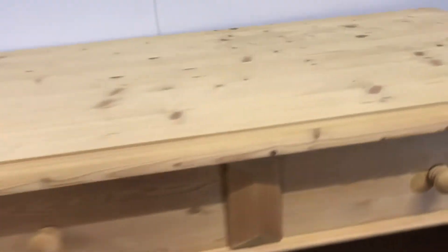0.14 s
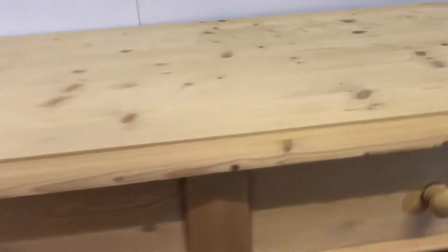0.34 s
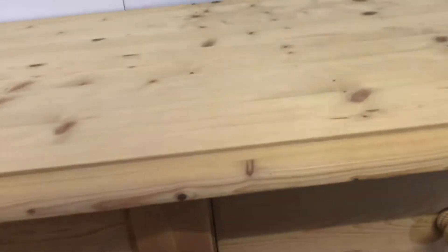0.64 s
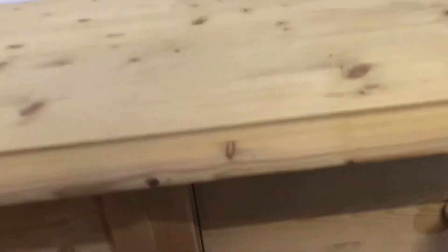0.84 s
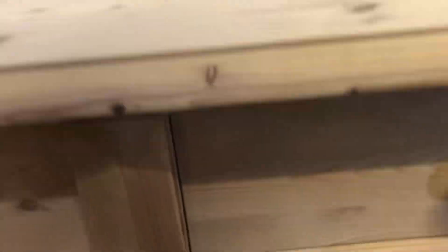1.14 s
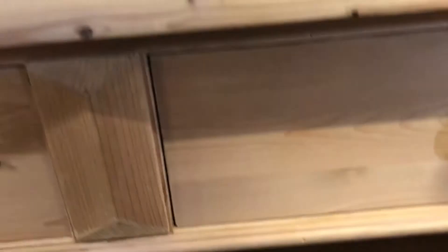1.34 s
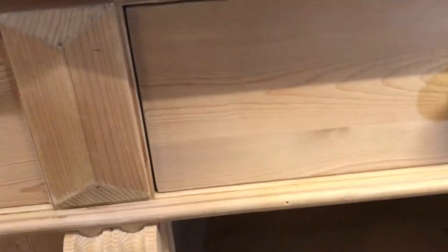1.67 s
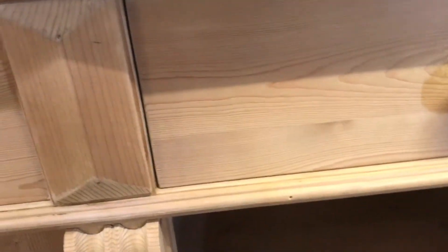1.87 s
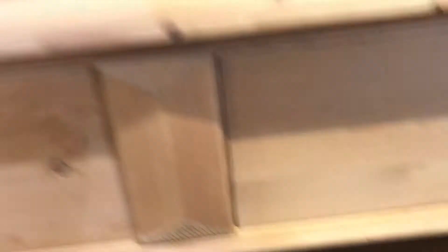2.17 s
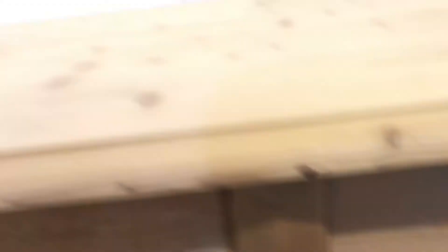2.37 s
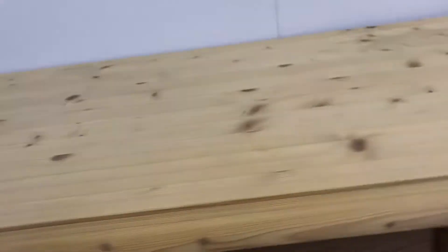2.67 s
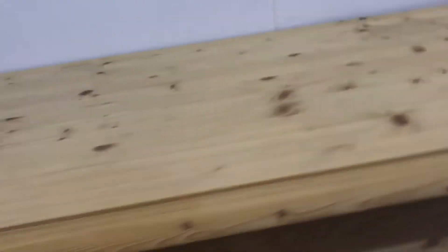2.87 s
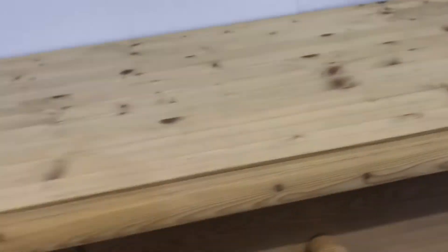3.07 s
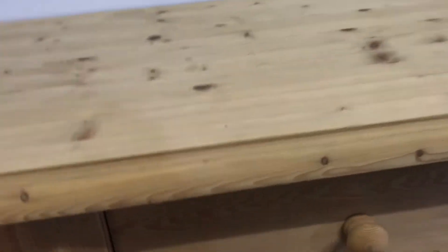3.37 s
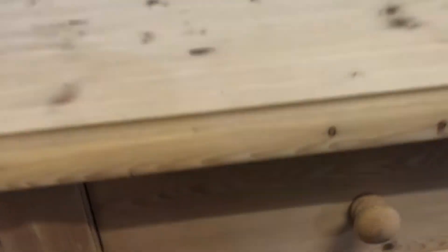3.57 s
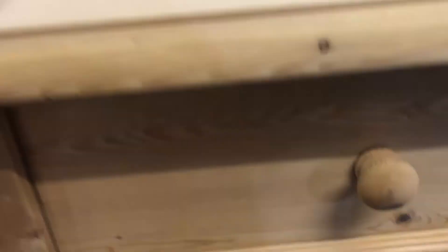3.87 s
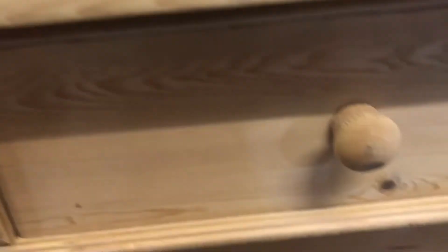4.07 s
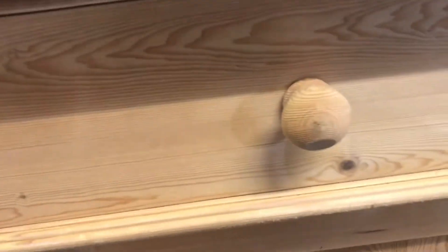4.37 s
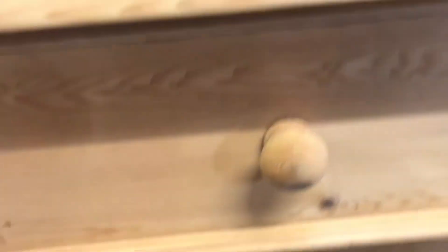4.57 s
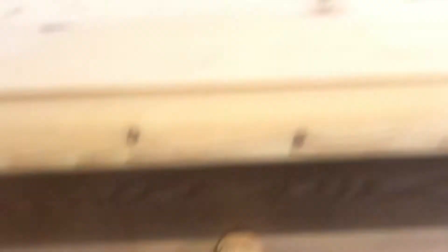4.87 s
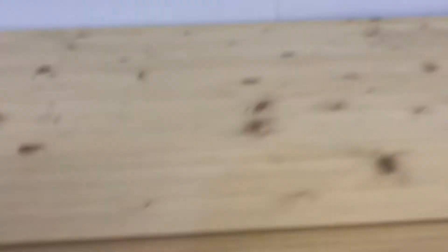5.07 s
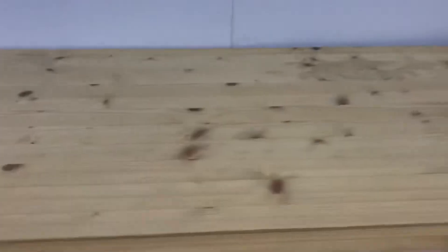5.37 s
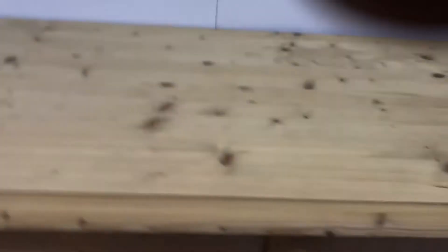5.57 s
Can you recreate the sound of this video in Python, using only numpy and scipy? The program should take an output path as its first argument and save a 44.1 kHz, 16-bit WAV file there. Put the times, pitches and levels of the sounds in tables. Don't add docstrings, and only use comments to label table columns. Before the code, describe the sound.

A quiet, spacious indoor hall with low hush, thin hiss and a very faint machine whine during the first second or so. Two tiny handling ticks come near 0.4 and 0.55 s. At 0.72 s a wooden cupboard door bangs shut, hollow and close, bouncing and striking again at 0.83 s. A second door thuds at 1.46 s with clattering rebounds until 1.6 s; a softer blow at 1.82 s comes with a scrape and short hinge squeaks. From 2 to 3.8 s there is only faint shuffling, cloth rubbing, soft bumps and ticks around 2.95 s. At 3.89 s a drawer jerks with a double knock, clacks at 4.05 s, and slams hard at 4.19 s. Another push brings a deep bump and piercing runner squeal at 4.43 s, then a catch clack at 4.51 s. Soft dragging follows, with clicks at 5.34 and 5.57 s and a bright sleeve swish around 5.5 s.

```python
import sys
import numpy as np
from scipy import signal
from scipy.fft import rfft, irfft, next_fast_len
from scipy.io import wavfile
from scipy.ndimage import uniform_filter1d

SR = 44100
rng = np.random.default_rng(int(sys.argv[2]) if len(sys.argv) > 2 else 0)


def voltage_ratio(level):
    return 10 ** (np.asarray(level, float) / 20)


def generate_wav(signal):
    frames = np.transpose(np.atleast_2d(signal))
    scaled = np.clip(frames, -1, 1) * 32767
    pcm = np.round(scaled).astype(np.int16)
    wavfile.write(sys.argv[1], SR, pcm)


N = 251896


def evened(x):
    return x / np.sqrt(np.mean(x ** 2) + 1e-20)


def read(points, hz):
    f, value = np.transpose(points)
    return np.interp(np.log(hz + 1), np.log(f + 1), value)


def add(mix, s, sound):
    part = mix[round(s * SR):][:len(sound)]
    part += sound[:len(part)]


def coloured(x, points):
    size = next_fast_len(len(x))
    gain = voltage_ratio(read(points, np.fft.rfftfreq(size, 1 / SR)))
    return evened(irfft(rfft(x, size) * gain, size)[:len(x)])


def band(x, lo_hz, hi_hz):
    return signal.sosfilt(signal.butter(3, [lo_hz, hi_hz], "bandpass", fs=SR, output="sos"), x)


def resonate(x, hz, width):
    r = np.exp(-np.pi * width / SR)
    return 2 * signal.lfilter([1 - r], [1, -r * np.exp(2j * np.pi * hz / SR)], x).real


def resonate_twice(x, hz, width):
    return resonate(resonate(x, hz, width), hz, width)


def gritty(spread_db, grain):
    lumps = evened(uniform_filter1d(rng.standard_normal(N), round(grain * SR)))
    return rng.standard_normal(N) * voltage_ratio(spread_db * lumps)


def swells(table):
    t = np.arange(0, N + 32, 32) / SR
    gain = np.zeros(len(t))
    for s, rise, *hold, fall, db in table:
        before = np.maximum(s - t, 0) / rise
        after = np.maximum(t - s - sum(hold), 0) / fall
        gain += voltage_ratio(db - 20 * (before + after))
    return np.interp(np.arange(N) / SR, t, gain)


def squeals(table, spread, shape=()):
    out, t = np.zeros(N), np.arange(SR // 3) / SR
    for row in table:
        s, hz, db, rise, t60 = (*row, *shape)
        whistle = evened(resonate_twice(rng.standard_normal(len(t)), hz, spread * hz))
        decay = voltage_ratio(db - 60 * np.maximum(t - rise, 0) / t60)
        add(out, s, decay * np.minimum(t / rise, 1) ** 2 * whistle)
    return out


def swings(table):
    out, t = np.zeros(N), np.arange(SR) / SR
    for s, hz, db, rise, t60 in table:
        swell = voltage_ratio(db - 60 * np.maximum(t - rise, 0) / t60) * np.minimum(t / rise, 1)
        add(out, s, -swell * np.sin(2 * np.pi * hz * t))
    return out


# start in Hz, drift in Hz per s, level in dB.
WHINE = [(1400, 0, -83), (1690, 0, -83), (2880, -40, -83), (3840, -40, -84), (4800, -40, -85),
         (5750, -60, -88), (6200, -300, -81)]
# time in seconds, gain in dB.
WHINE_FADE = [(0, 0.5), (.7, 5.5), (1.25, 2), (1.45, -24), (5.71, -13)]
# frequency in Hz, density in dB per Hz.
HUSH = [(12, -9.5), (20, 9), (44, -9.5), (123, -14), (156, -19), (300, -23), (534, -23), (3500, -33.5),
        (4550, -65), (7700, -120)]
# frequency in Hz, density in dB per Hz.
HISS = [(2060, -40), (3500, -10), (3870, 0), (4210, -5), (11300, -2), (16000, -6)]


def air():
    t = np.arange(N) / SR
    waver = resonate(rng.standard_normal((len(WHINE), N)), 0, 8)
    whine = np.zeros(N)
    for (hz, drift, db), w in zip(WHINE, waver):
        whine += voltage_ratio(db + 2.2 * evened(w)) * np.sin(2 * np.pi * (hz + drift * t / 2) * t)
    hush = voltage_ratio(-61) * coloured(rng.standard_normal(N), HUSH)
    hiss = voltage_ratio(-72) * coloured(rng.standard_normal(N), HISS)
    return hush + hiss + whine * voltage_ratio(np.interp(t, *np.transpose(WHINE_FADE)))


# start in seconds, level in dB.
PALMS = [(.01, -66.5), (.55, -61), (1.38, -71.5), (2.64, -69), (2.85, -67), (3.02, -65), (5.122, -58.5),
         (5.35, -59), (5.555, -60)]


def palms():
    rise_s, fall_s = 0.062, 0.12
    return swells([(s, rise_s, fall_s, db) for s, db in PALMS])


# start, rise, hold if any and fall in seconds, level in dB.
SLEEVES = [(.16, .4, 0.22, -76), (.46, .5, 0.14, 0.13, -73.5), (1.35, 1, 0.019, .03, -71),
           (2.332, 0.13, 0.14, -62), (2.744, 0.39, .12, -75), (2.982, 0.078, .04, -55),
           (3.03, .05, 0.091, .3, -66.5), (4.95, 0.52, 0.12, 2, -67), (5.6, .4, .11, .1, -60.5)]
# frequency in Hz, density in dB per Hz.
RUSTLE = [(1500, -30), (2500, 0), (6000, -1), (9000, -3), (12000, -4), (14000, -8), (16000, -14)]


def sleeves():
    return swells(SLEEVES) * coloured(gritty(0.91, 0.0032), RUSTLE)


# start, rise, hold if any and fall in seconds, level in dB.
SOLES = [(.2, 2.5, 0.31, 0.39, -66.5), (1.12, 0.059, 0.0092, 0.61, -66), (2.08, .03, 0.009, 0.11, -67),
         (2.332, 0.14, .01, 0.13, -59.5), (2.98, 0.42, .15, .3, -61), (3.265, .06, .07, -61),
         (3.488, .2, .01, 0.083, -65), (4.66, 0.033, 0.0083, 0.13, -60), (5.06, 0.35, 0.035, 0.49, -62),
         (5.6, 0.76, 0.058, 0.38, -62.5)]
# frequency in Hz, density in dB per Hz.
SHUFFLE = [(100, -15), (200, -2.5), (500, 3), (1200, -2.5), (2300, -5), (3500, -11), (5000, -19),
           (8000, -60)]


def soles():
    shuffle = coloured(gritty(2.24, .008), SHUFFLE)
    rumble_points = [(15, -30), (30, 8), (55, -4.0), (100, -5.5), (160, -2), (300, -28)]
    rumble = coloured(rng.standard_normal(N), rumble_points)
    drag = swells(SOLES)
    return drag * shuffle + (voltage_ratio(-11.5) * drag + palms()) * rumble


# start, rise, hold if any and fall in seconds, level in dB.
DRAGS = [(.534, .35, .12, -66.5), (2.314, 0.18, 0.081, -68), (2.614, 0.083, 0.11, -69.5),
         (2.93, 0.14, .3, .12, -60), (3.472, .09, 0.071, -65.5), (4.7, 0.027, 0.37, -65.5),
         (5.15, 0.18, 0.4, -62.5), (5.7, 0.25, .1, -62)]
# frequency in Hz, width in Hz, level in dB.
BOARD = [(783, 92, 1.5), (939, 96, 3), (1066, 90, 2), (1400, 110, -8.5)]
# frequency in Hz, width in Hz, level in dB.
BOX = [(240, 58, -0.2), (321, 53, 2), (402, 47, -3)]


def drags():
    rub = gritty(1.9, 0.008)
    board = evened(sum(voltage_ratio(db) * resonate_twice(rub, hz, w) for hz, w, db in BOARD))
    box = evened(sum(voltage_ratio(db) * resonate_twice(rub, hz, w) for hz, w, db in BOX))
    hand = swells(DRAGS)
    return hand * board + (voltage_ratio(-11.5) * hand + palms()) * box


# start in seconds, peak in dB, ring in Hz.
TICKS = [(0.4219, -29.5, 2350), (0.546, -26.5, 4200), (1.0675, -40, 4020), (2.174, -40, 2160),
         (2.9159, -28, 4500), (2.952, -27, 5030), (2.981, -27.5, 6800), (2.985, -29, 6960),
         (2.9967, -28.5, 6900), (3.6915, -37, 2200), (5.3403, -21, 11040), (5.3473, -27, 4300),
         (5.5745, -20, 4270)]


def ticks():
    out, t = np.zeros(N), np.arange(1500) / SR
    grip_s = 5
    for s, peak_db, hz in TICKS:
        click = band(rng.standard_normal(len(t)), 0.7 * hz, min(2.4 * hz, 15000))
        snap = voltage_ratio(-60 * t / 0.0058) * (0.99 * np.sin(2 * np.pi * hz * t) + click)
        thud = -np.sin(2 * np.pi * 190 * t) * voltage_ratio(-60 * t / 0.0088)
        add(out, s, voltage_ratio(peak_db - 10.5) * snap + voltage_ratio(2 * peak_db + 12.5) * thud * (s > grip_s))
    return out


# start in seconds, pitch in Hz, level in dB,
# rise and t60 in seconds.
BUMPS = [(0.541, 70, -55, 0.011, 0.081), (0.693, 170, -43, 0.004, 0.07), (1.422, 119, -50, 0.011, 0.18),
         (1.42, 262, -64, 0.013, 0.099), (2.818, 92.4, -49, 0.073, 0.26), (3.02, 44.5, -41.5, 0.021, 0.24),
         (3.44, 87, -47.5, 0.031, 0.09), (3.447, 400, -57.5, 0.031, 0.27), (4.438, 65.8, -26, 0.004, 0.2),
         (3.06, 70, -52, .02, .2), (3.14, 45, -52, .02, .2), (3.31, 45, -52, .02, .15),
         (3.52, 48, -54, .02, .4), (3.44, 180, -60, .03, .2), (2.83, 190, -60, .02, .2),
         (5.1, 207.5, -51, 0.024, 0.054), (5.102, 52.7, -43, 0.021, 0.078), (3.888, 549, -28.5, 0.03, .4),
         (4.5, 78, -41, .025, .3), (5.21, 55, -52, .03, .2)]


def bumps():
    return swings(BUMPS)


# frequency in Hz, density in dB per Hz.
CRACK = [(1500, -52), (2600, 4), (3400, 3), (4600, 8), (6000, 2), (8500, -2.5), (11500, -3), (13000, -5),
         (16000, -13)]


def blows(table, modes, rise, hard_db, damping=1):
    out, t = np.zeros(N), np.arange(SR // 2) / SR
    build_s = .0022
    usual_chatter_s, crack_db_per_halving = 0.049, 6.5
    for s, blow_db, boom_db, knock_db, t60 in table:
        t60 = max(t60, .01)
        crack_db = blow_db + hard_db + crack_db_per_halving * np.log2(usual_chatter_s / t60)
        fall = voltage_ratio(-60 * t / t60) * np.minimum(t / (rise + build_s), 1)
        lumps = evened(uniform_filter1d(rng.standard_normal(len(t)), 60))
        chatter = fall * rng.standard_normal(len(t)) * voltage_ratio(2.35 * lumps)
        chatter += 1.05 * np.exp(-((t - rise) / (0.14 * rise)) ** 2)
        push = band(np.sin(np.pi * np.clip((t - .002) / 0.0074, 0, 1)), 40.4, 360)
        drives = [push, band(chatter, 150, 800), band(chatter, 600, 1.06 * modes[-1][0])]
        parts = np.array([0 * t, .022 * drives[1], .015 * drives[2]])
        spots = rng.standard_normal((len(modes), 2))
        for (hz, db, ring), (spot, shift) in zip(modes, spots):
            group = (hz > 160) + (hz > 700)
            mode = resonate(drives[group], hz * (1 + .008 * shift), 2.2 * damping / ring)
            parts[group] += voltage_ratio(db + 1.5 * spot) * ring * mode
        parts /= abs(parts).max(axis=1, keepdims=True)
        crack = coloured(rng.standard_normal(len(t)), CRACK) * fall
        add(out, s, voltage_ratio([boom_db, blow_db - 2, knock_db - 0.6]) @ parts + voltage_ratio(crack_db + 5.3) * crack)
    return out


# start in seconds, blow, boom and knock in dB, chatter t60 in seconds.
DOOR_BLOWS = [
    (0.721, -15, -16, -18.5, 0.074),
    (0.832, -17, -23, -23.5, 0.15),
    (1.463, -18.5, -16.5, -24, 0.11),
    (1.822, -22, -23, -38, 0.061),
]
# start in seconds, blow, boom and knock in dB, chatter t60 in seconds.
DOOR_REBOUNDS = [(0.736, -14, -38, -21.5, 0.036), (0.751, -17.5, -29, -42, 0.034),
                 (0.845, -24, -25, -49, 0.1), (0.903, -36, -43, -45, 0.082), (1.477, -17, -50, -31, 0.013),
                 (1.491, -23.5, -43, -48, 0.057), (1.546, -20.5, -36, -32.5, 0.16),
                 (1.564, -19.5, -35, -41, 0.13), (1.609, -26.5, -28, -37, 0.054),
                 (1.69, -47, -48, -48, 0.042), (1.837, -27, -36, -31.5, 0.11), (1.87, -37, -50, -56, 0.036),
                 (1.898, -46, -40, -49, 0.042), (1.943, -45, -60, -52, 0.061)]
# frequency in Hz, level in dB, t60 in seconds.
DOOR = [(54, -21, 0.71), (79.5, -22, 0.07), (110, 6, 0.13), (127.2, 0.5, 0.18), (168, -13.5, 0.4),
        (230.3, -5, 0.097), (275, 0.5, 0.09), (295, -25, 0.035), (403, -5.5, 0.15), (431.6, 4.5, 0.1),
        (466, -10, 0.14), (552, 1, 0.1), (535, -15, 0.11), (795, 0.5, 0.055), (915, 0, 0.037),
        (1064, 9, .04), (1206, 4, 0.031), (1270, 1, .05), (1464, 8, 0.037), (1630, -21, 0.056),
        (1810, -19, .04), (2232, -6, 0.05), (2490, -8, 0.07)]


def doors():
    hits = blows(DOOR_BLOWS, DOOR, 0.001557, hard_db=-25, damping=1.24)
    return hits + blows(DOOR_REBOUNDS, DOOR, 0.00493, hard_db=-28.5, damping=1.86)


# frequency in Hz, t60 in seconds.
HALL = [(40, 0.73), (120, 0.75), (300, 0.55), (1000, 0.52), (2000, 0.4), (4000, 0.45), (8000, 0.4),
        (16000, 0.11)]
# frequency in Hz, level in dB.
HALL_BASS = [(45, -5), (75, -6), (130, -6), (200, -1), (500, -1), (1200, 0), (2200, -1.5), (3500, 1.5)]


def hall(x):
    hz, t, z = signal.stft(rng.standard_normal(SR), SR, nperseg=512)
    decay = voltage_ratio(read(HALL_BASS, hz)[:, None] - 60 * t / read(HALL, hz)[:, None])
    tail = signal.istft(z * decay, SR, nperseg=512)[1]
    tail = tail * np.minimum(np.arange(len(tail)) / (0.0034 * SR), 1)
    return signal.fftconvolve(x, tail / np.linalg.norm(tail))[:N]


# start in seconds, pitch in Hz, level in dB, rise and t60 in seconds.
KNOCKS = [(.724, 1080, -30, .005, .07), (.745, 2520, -46, .006, .08), (.831, 1100, -35, .005, .06),
          (.834, 1400, -39, .005, .05), (.84, 2550, -48, .006, .07), (1.466, 1080, -31, .005, .06),
          (1.466, 1550, -36, .005, .05), (1.543, 1080, -37, .005, .05), (1.545, 1550, -44, .004, .04),
          (1.559, 1070, -37, .005, .06), (1.561, 1550, -42, .005, .05), (1.61, 1070, -41, .005, .06),
          (1.611, 2400, -52, .005, .05), (3.887, 1100, -31, .004, .08), (3.925, 1100, -41, .008, .12),
          (4.053, 1750, -36, .004, .04), (4.053, 2700, -40, .004, .05), (4.053, 850, -38, .004, .05),
          (4.075, 1650, -46, .004, .04), (4.125, 650, -46, .006, .05), (4.152, 1350, -34, .004, .04),
          (4.152, 850, -38, .004, .04), (4.188, 2550, -36, .004, .04), (4.2, 1060, -33, .006, .08),
          (4.34, 2170, -49, .006, .06), (4.465, 950, -48, .008, .08), (4.53, 1000, -40, .004, .04)]


def knocks():
    return squeals(KNOCKS, .07)


# start in seconds, pitch in Hz, level in dB, rise and t60 in seconds.
RINGS = [(.74, 430, -29, .012, .12), (.775, 118, -33, .02, .7), (.845, 415, -30, .012, .1),
         (.88, 560, -41, .015, .15), (.915, 122, -35, .02, .5), (1.464, 265, -30, .01, .11),
         (1.478, 420, -28, .012, .09), (1.55, 265, -31, .014, .11), (1.552, 430, -29, .014, .09),
         (1.595, 265, -38, .015, .15), (1.695, 250, -46, .01, .1), (3.915, 431, -34, .015, .17),
         (4.23, 425, -31, .02, .3), (4.22, 190, -31, .015, .25), (4.196, 72, -21, .008, .07),
         (4.44, 300, -44, .02, .12), (1.56, 62, -32, .015, .2), (1.86, 70, -38, .03, .4),
         (2.05, 58, -55, .08, .4), (3.95, 188, -40, .03, .35), (4.5, 200, -46, .02, .3)]


def rings():
    return swings(RINGS)


# start in seconds, pitch in Hz, level in dB.
CHIRPS = [(1.325, 1050, -55.5), (3.452, 1085, -55.5), (5.115, 7650, -61)]


def chirps():
    return squeals(CHIRPS, 0.072, (.012, .08))


# start in seconds, centre in Hz, level in dB.
SLIPS = [(1.673, 6000, -64), (1.740, 9000, -59.5), (1.763, 4820, -43.5), (1.789, 4500, -40.5),
         (1.834, 4500, -38.5), (1.870, 4500, -44), (1.898, 4500, -50.5)]


def slips():
    return squeals(SLIPS, 0.96, (.0025, .08))


# start in seconds, pitch in Hz, level in dB, rise and t60 in seconds.
SQUEALS = [
    (1.790, 1680, -44, 0.0026, 0.091),
    (1.872, 3050, -41.5, 0.021, 0.09),
    (4.205, 12300, -60, 0.014, 0.12),
    (4.340, 6200, -59, 0.0037, 0.076),
    (4.341, 12300, -63, 0.01, 0.073),
    (4.430, 8050, -33.5, .010, 0.13),
]
# start in seconds, pitch in Hz, level in dB, rise and t60 in seconds.
THIN_SQUEALS = [(1.873, 4500, -48, .023, 0.055), (1.93, 1720, -56, 0.016, .08),
                (4.35, 1900, -46, 0.01, 0.12), (4.337, 4100, -50, 0.005, 0.09),
                (4.423, 12100, -44, 0.0037, 0.21), (4.428, 4710, -49, 0.007, .05),
                (4.434, 15400, -48, .006, 0.12)]


def dry_squeals():
    return squeals(SQUEALS, 0.1) + squeals(THIN_SQUEALS, 0.037)


# start in seconds, pitch in Hz, level in dB, rise and t60 in seconds.
STREAKS = [(1.79, 3550, -50, .005, .06), (1.892, 3020, -44, .006, .14), (1.89, 4500, -51, .005, .07),
           (4.7, 6300, -68, .006, .05), (5.338, 3900, -47, .002, .03), (5.348, 4550, -52, .004, .05),
           (5.39, 4650, -50, .14, .1), (5.4, 2100, -65, .02, .5), (5.53, 12500, -50, .03, .03)]


def streaks():
    return squeals(STREAKS, .06)


# start, rise and fall in seconds, level in dB.
SLIDES = [
    (1.796, 0.045, .17, -39.5),
    (4.075, 0.025, 0.068, -51),
    (4.17, 0.13, 0.025, -53.5),
    (4.41, 0.12, .045, -43.5),
    (4.524, 0.057, 0.07, -43.5),
]
# frequency in Hz, width in Hz, level in dB.
RUNNER = [(861, 87, 10.5), (1246, 120, 6.5), (1600, 780, 15), (3050, 180, 7), (4500, 260, -28),
          (6300, 500, -18.5)]


def slides():
    grains = gritty(4.6, 0.0033)
    scrape = np.zeros(N)
    for hz, width, db in RUNNER:
        scrape += voltage_ratio(db) * resonate_twice(grains, hz, 1.5 * width) / np.sqrt(width)
    grit_points = [(2500, -30), (5000, 0), (8000, -4), (11000, -6), (13000, -14), (16000, -26)]
    grit = coloured(gritty(2.5, .003), grit_points)
    return swells(SLIDES) * (evened(scrape) + voltage_ratio(-19.5) * grit)


# start in seconds, centre in Hz, level in dB, rise and t60 in seconds.
SCUFFS = [(2.59, 700, -64, .02, .12), (2.64, 1000, -65, .015, .15), (2.82, 900, -64, .01, .08),
          (2.91, 250, -62, .008, .06), (3.1, 2300, -64, .01, .15), (3.25, 2500, -62, .012, .1),
          (3.33, 2700, -67, .006, .05), (3.44, 800, -62, .012, .12), (4.34, 9000, -60, .006, .12),
          (4.41, 2600, -48, .006, .04)]


def scuffs():
    return squeals(SCUFFS, .9)


# start in seconds, pitch in Hz, level in dB, rise and t60 in seconds.
RUBS = [(2.97, 1450, -62, .03, .2), (2.98, 2230, -65, .02, .15), (3.04, 2420, -65, .02, .15),
        (3.1, 2420, -65, .02, .12), (3.45, 2150, -67, .03, .2), (3.46, 2650, -72, .02, .2),
        (4.765, 5880, -71, .02, .25), (4.435, 11500, -58, .006, .1)]


def rubs():
    return squeals(RUBS, .02)


# start in seconds, centre in Hz, level in dB.
SNAPS = [(3.2825, 12000, -53), (4.627, 9000, -58), (4.6565, 11500, -57)]


def snaps():
    return squeals(SNAPS, 0.58, (.0005, .008))


# start in seconds, blow, boom and knock in dB, chatter t60 in seconds.
DRAWER_PULLS = [
    (3.885, -17.5, -27, -20, 0.075),
    (3.898, -19, -33, -25.5, 0.048),
]
# start in seconds, blow, boom and knock in dB, chatter t60 in seconds.
DRAWER_BLOWS = [
    (4.187, -13.5, -16.5, -12.5, 0.068),
    (4.196, -27, -27, -17.5, 0.026),
    (4.205, -13.5, -19, -14.5, 0.055),
    (4.239, -24, -30, -34, 0.045),
    (4.263, -40, -33, -49, 0.037),
]
# frequency in Hz, level in dB, t60 in seconds.
DRAWER = [(63.5, -4, 0.1), (106.2, -3, 0.15), (156, 4.5, 0.19), (184, -1, .12), (261, 4, 0.076),
          (303, -7, 0.099), (371, 2, 0.067), (423.5, 1, 0.1), (544.3, 1, 0.12), (618, -12, 0.073),
          (750, 4, 0.03), (824, 2.5, 0.03), (1060, 9, 0.035), (1300, 8.5, 0.043), (1550, 6, 0.016),
          (1720, 3, 0.02), (1840, -4, 0.017), (2133, 0, 0.03), (2330, -10, 0.033), (2480, -14, 0.03)]


def drawer():
    pulls = blows(DRAWER_PULLS, DRAWER, 0.001074, hard_db=-50, damping=1.6)
    return pulls + blows(DRAWER_BLOWS, DRAWER, 0.000894, hard_db=-31.5, damping=1.88)


# start in seconds, blow, boom and knock in dB, chatter t60 in seconds.
CATCH_CLACKS = [(4.052, -46, -64, -25, 0.036), (4.151, -45, -63, -26, 0.031), (4.416, -52, -63, -33, 0.03),
                (4.509, -31, -77, -19, 0.038), (4.529, -53, -53, -29, 0.034)]
# frequency in Hz, level in dB, t60 in seconds.
CATCH = [(70, 0, 0.12), (240, 2.5, 0.044), (400, -2, 0.045), (844, 5.5, 0.044), (1100, 7.5, 0.033),
         (1370, 4, 0.019), (1617, 9, 0.036), (1950, 2.5, 0.056), (2460, -3, 0.025), (2760, -4, 0.03),
         (3400, -16, 0.022), (3610, -12, 0.03)]


def catch():
    return blows(CATCH_CLACKS, CATCH, 0.00086, hard_db=-13, damping=1.12)


# start in seconds, centre in Hz, level in dB, rise and t60 in seconds.
RATTLES = [(4.19, 4000, -45, .003, .12), (4.212, 3500, -49, .006, .12), (4.425, 11000, -56, .004, .05),
           (4.512, 9300, -54, .01, .22), (4.515, 12600, -60, .012, .2), (4.53, 8100, -55, .01, .33),
           (4.582, 11000, -60, .001, .02), (5.574, 12000, -50, .0006, .01)]


def rattles():
    return squeals(RATTLES, .2)


JUDDER_SIDES_DB = [-9, -9, 0, -2, -4, -12]


def judder():
    start_s, centre_hz, judder_hz, level_db, t60 = 4.432, 7810, 236, -38, .16
    out, t = np.zeros(N), np.arange(SR // 3) / SR
    flutter = evened(resonate(rng.standard_normal((len(JUDDER_SIDES_DB), len(t))), 0, 60))
    tones = np.zeros(len(t))
    for k, (db, w) in enumerate(zip(JUDDER_SIDES_DB, flutter)):
        hz = centre_hz + (k - 2) * judder_hz
        tones += voltage_ratio(db + 3.0 * w) * np.sin(2 * np.pi * hz * t + k * k)
    add(out, start_s, voltage_ratio(level_db - 60 * t / t60) * np.minimum(t / .009, 1) ** 2 * tones)
    return out


# start, rise, hold if any and fall in seconds, level in dB.
SWISHES = [
    (5.52, 0.053, 0.041, .012, -38),
    (6, .3, .04, .03, -55),
]
# frequency in Hz, density in dB per Hz.
SWISH = [(2000, -21), (3910, -5), (4700, 4), (6640, -11), (9000, -3), (11900, 11), (13600, 0), (16000, -2)]


def swishes():
    return swells(SWISHES) * coloured(gritty(2.9, 0.0032), SWISH)


def scene():
    wood = doors() + slips() + slides() + drawer() + catch()
    squeal = chirps() + dry_squeals() + snaps()
    room = voltage_ratio(-8) * hall(wood + voltage_ratio(-5) * squeal)
    near = air() + sleeves() + soles() + drags() + ticks() + bumps() + rings() + swishes()
    fine = knocks() + streaks() + scuffs() + rubs() + rattles() + judder()
    return (wood + squeal + room + near + fine)[None]


def low_pass(x):
    return signal.sosfilt(signal.butter(12, 16500, fs=SR, output="sos"), x)


def record(dry):
    x = signal.sosfilt(signal.butter(2, 32, "highpass", fs=SR, output="sos"), dry)
    x = .42 * np.tanh(x / .42)
    x = signal.oaconvolve(x, signal.firwin(511, 15900, window=("kaiser", 9), fs=SR)[None], "same")
    return low_pass(x)


dry = scene()
out = record(dry)
generate_wav(out)
```